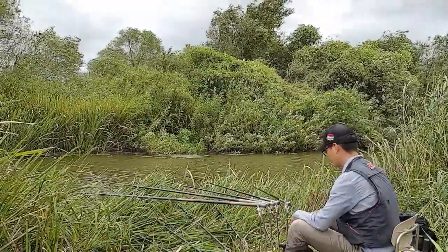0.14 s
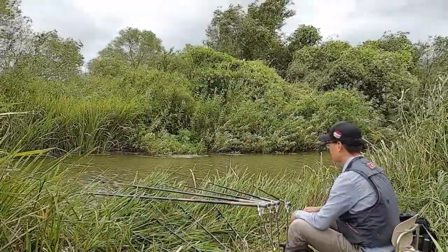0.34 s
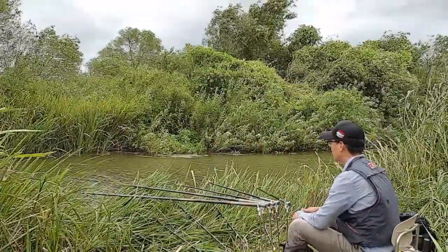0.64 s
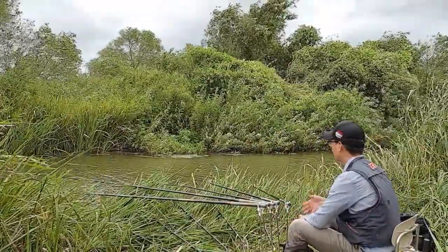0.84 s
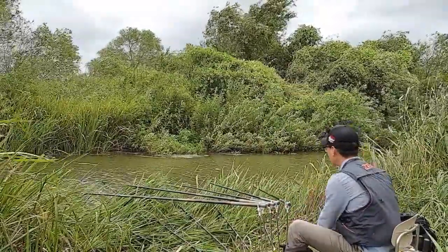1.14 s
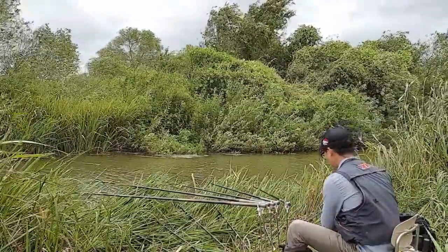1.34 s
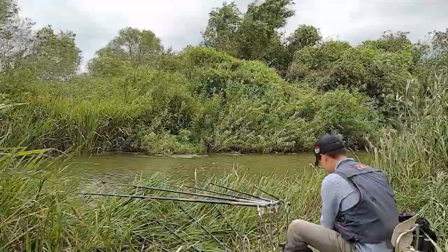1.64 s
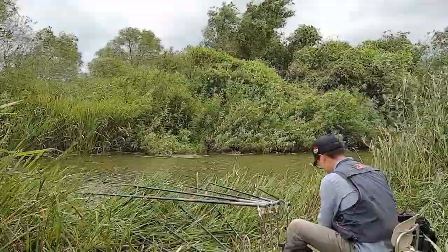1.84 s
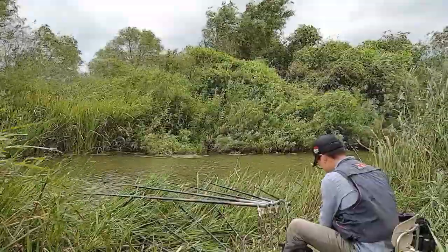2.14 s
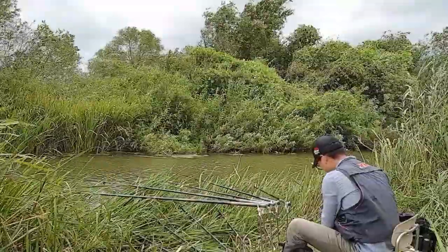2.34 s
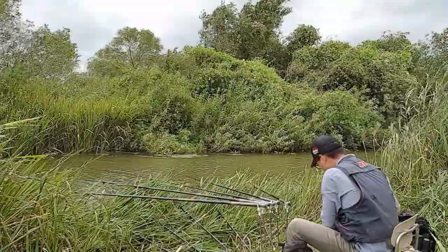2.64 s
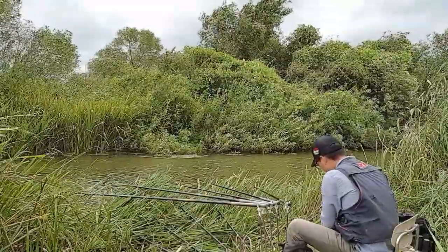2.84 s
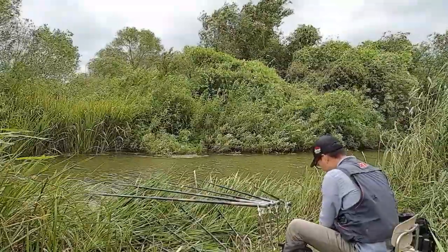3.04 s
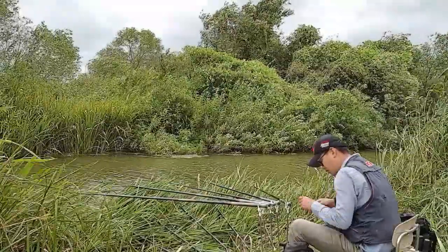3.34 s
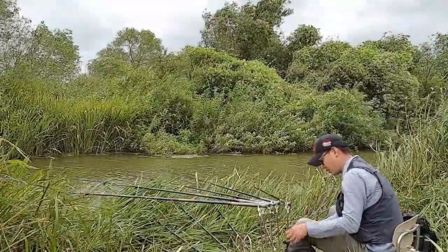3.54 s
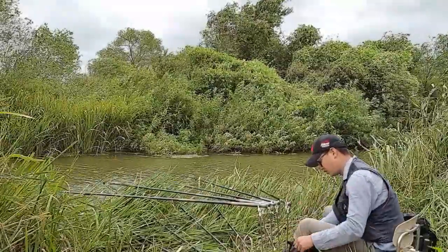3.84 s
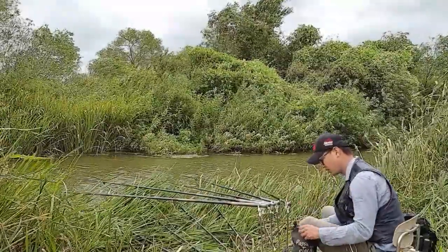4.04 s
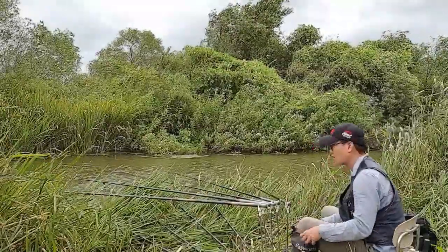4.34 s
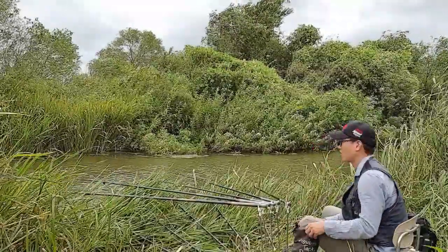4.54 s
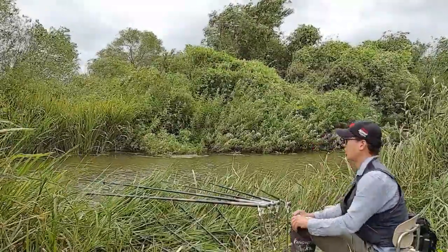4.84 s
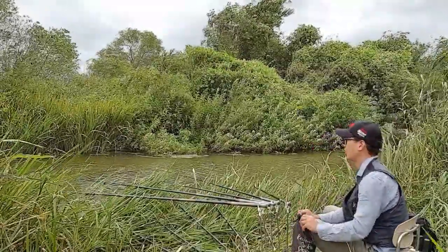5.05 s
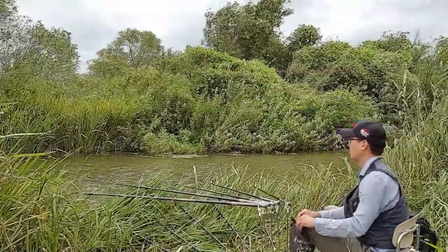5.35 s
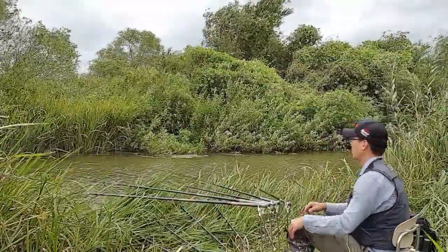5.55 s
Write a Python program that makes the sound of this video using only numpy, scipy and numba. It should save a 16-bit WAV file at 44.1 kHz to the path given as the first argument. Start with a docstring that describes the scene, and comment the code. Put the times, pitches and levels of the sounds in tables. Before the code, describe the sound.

Cicadas buzz steadily in riverside bushes while gusty wind thumps and flutters over the microphone and reeds rustle softly.

```python
"""Cicadas buzz in the bushes by a windy summer riverbank, heard at two small microphone ports.
Clicks from buckling ribs shape noise that rings through body tones; a wider, unrelated chorus blurs behind.
Leaves and reeds rush from the other side as coloured noise that wavers.
Gusts buffet the ports with rumble and flutter, noise shaken by eddies, and with short pops of air."""
import sys
import numpy as np
from scipy import signal
from scipy.fft import rfft, irfft
from scipy.io import wavfile
from scipy.ndimage import uniform_filter1d
from numba import njit

SR = 44100
rng = np.random.default_rng(int(sys.argv[2]) if len(sys.argv) > 2 else 0)


def volts(x):
    """Linear amplitude factor 10**(x/20) for a level x in dB, scalar or array-like."""
    e = np.asarray(x, float) / 20
    return 10 ** e


def generate_wav(signal):
    """Clip the signal to [-1, 1] and save it as 16-bit WAV at the path in sys.argv[1]."""
    frames = np.transpose(np.atleast_2d(signal))
    scaled = np.clip(frames, -1, 1) * 32767
    pcm = np.round(scaled).astype(np.int16)
    wavfile.write(sys.argv[1], SR, pcm)


N = 251149
T = np.arange(N) / SR
HZ = np.arange(N // 2 + 1) * SR / N

# Gusts at the ports. Each row: time in seconds, rumble level at the left port in dB, flutter level in dB,
# left minus right rumble level in dB.
GUSTS = [(0.0, -53, -40.5, -10), (0.08, -41, -56, 22), (0.23, -33.5, -39, -4), (0.42, -52.5, -52, -4.5),
         (0.56, -60, -54, -16), (0.63, -34.5, -42.5, 10), (0.75, -37, -37, 6), (1.0, -36, -42.5, 5),
         (1.21, -40, -47, 19), (1.48, -37, -40, 6), (1.68, -42.5, -51, 0), (1.8, -36, -36, -2.5),
         (1.92, -31.5, -36, 4), (2.07, -33, -43.5, 2), (2.15, -34, -34, 12), (2.29, -49, -53, 6),
         (2.45, -34, -39.5, 30), (2.58, -35.5, -42.5, 15), (2.7, -27.5, -34.5, 13), (2.84, -32, -35, 10),
         (2.92, -39, -45.5, 36), (3.24, -41.5, -43.5, 37), (3.36, -38, -47, -7), (3.48, -43.5, -49, 22),
         (3.76, -43, -52, 26), (3.86, -43, -52, 8), (4.33, -39, -47.5, 12), (4.46, -71, -58, 11),
         (4.78, -51, -57, 5), (4.85, -61, -68, 4), (4.92, -40, -46.5, 11), (5.05, -73, -58, -20),
         (5.17, -53, -64, -1), (5.69, -61, -59, 31)]


def curves(table):
    """Columns of a table after its times, drawn as one value a sample."""
    s, *columns = np.transpose(table)
    return [np.interp(T, s, column) for column in columns]


def unit(x):
    """Scale to rms 1."""
    return x / np.sqrt(np.mean(x ** 2))


def colour(x, points):
    """Filter through a spectrum of (Hz, dB) points."""
    hz, db = np.transpose(points)
    gain_db = np.interp(np.log(HZ + 1), np.log(hz), db, left=-90, right=-90)
    return irfft(rfft(x) * volts(gain_db), N)


def band_rms(x, lo, hi):
    """Rms between lo and hi Hz of the mean of both ports."""
    power = abs(rfft(np.mean(x, axis=0))) ** 2
    return np.sqrt(2 * power[(HZ > lo) & (HZ < hi)].sum()) / N


def walk(rate):
    """Random levels held 1 / rate s and slewed twice; spread 1."""
    hold = int(SR / rate)
    steps = np.repeat(rng.standard_normal(N // hold + 1), hold)
    return unit(uniform_filter1d(uniform_filter1d(steps, hold), hold)[:N])


def noise():
    """Unrelated noise for each port."""
    return rng.standard_normal((2, N))


def blend(common, share):
    """Mix a sound common to the ports with unrelated noise; share is the common part of the power."""
    return np.sqrt(share) * common + np.sqrt(1 - share) * noise()


@njit
def ring(x, hz, width):
    """A moving resonance: four state-variable band-passes in a row for steep skirts, gain 1 at the centre."""
    y, band, low = x.copy(), np.zeros(4), np.zeros(4)
    for i in range(len(x)):
        g, damping = np.tan(np.pi * hz[i] / SR), width / hz[i]
        for n in range(4):
            v = (band[n] + g * (y[i] - low[n])) / (1 + g * (g + damping))
            band[n], low[n] = 2 * v - band[n], low[n] + 2 * g * v
            y[i] = damping * v
    return y


def strokes(jitter_ms=.4):
    """Loudness of the nearest singer: each stroke buckles its ribs in turn, each a click that dies fast."""
    # Pace of the song. Each row: time in seconds, mean tymbal strokes a second.
    pace = [(0, 38.1), (3.0, 37.9), (5.69, 37.6)]
    # Ribs that buckle in one stroke. Each row: mean delay after its start in ms, mean click level in dB.
    ribs = [(0, 0.5), (4.7, -3), (9.5, -4.5), (13.5, -8.5), (18.3, -19.5)]
    phase = np.cumsum(curves(pace)[0] * (1 + .006 * walk(6))) / SR
    starts = np.flatnonzero(np.diff(np.floor(phase)))
    clicks = np.zeros(N)
    for ms, db in ribs:
        late, strength = rng.standard_normal((2, len(starts)))
        at = starts + ((ms + jitter_ms * late) * SR / 1000).astype(int)
        np.add.at(clicks, np.clip(at, 0, N - 1), volts(db + 1.5 * strength))
    decay = np.exp(-1 / (SR * .0012))  # a click dies within about a millisecond
    singer = unit(signal.lfilter([1], [1, -decay], clicks))
    # neighbours in the same bushes fill the gaps between its clicks
    return unit(np.sqrt(singer ** 2 + 1.1))


def cicadas(right_db=0.73, lag=14):
    """Clicks from one side reach the right port first, by lag samples; the far chorus is an unrelated blur."""
    # Swells of the song. Each row: time in seconds, level in dB.
    song = [(0.0, -30), (0.07, -33.5), (0.16, -31.5), (0.55, -30), (0.68, -33), (0.8, -32), (1.3, -31.5),
            (1.43, -28.5), (1.6, -30.5), (1.85, -30.5), (2.15, -33.5), (2.33, -29.5), (2.45, -33),
            (2.6, -31.5), (3.0, -33.5), (3.13, -30.5), (3.6, -31.5), (3.76, -32.5), (3.87, -30), (4.0, -33),
            (4.1, -29), (4.23, -31.5), (4.76, -28), (4.87, -32), (4.97, -29), (5.28, -28.5), (5.69, -29)]
    # Tuning of the body tones. Each row: time in seconds, rise in percent.
    tuning = [(0, -.8), (2.4, -.8), (3.5, -.3), (4.5, .8), (5.0, 1.8), (5.69, 2.2)]
    # Body tones, low to high. Each row: centre in Hz before tuning, width in Hz, gain in dB,
    # share of the power heard from one direction, 0 to 1.
    tones = [(3493, 320, -2.5, 0.46), (4084, 1520, -11.5, 1), (4715, 870, 0.53, 0.39),
             (5576, 450, 0.6, 0.05), (6157, 500, 1.33, 0.5), (6780, 300, -3, 0.92),
             (7280, 1240, -9.5, 0.32), (8910, 1470, -13.5, 0.23), (10890, 3200, -12.5, 0.36),
             (13700, 5800, -25, 0.2)]
    db, tune, clicks = curves(song)[0], 1 + curves(tuning)[0] / 100, strokes()
    main, treble = np.zeros((2, N)), np.zeros((2, N))
    swell_db = 0.48 * walk(22.1) + 0.44 * walk(9)
    for hz, width, tone_db, share in tones:
        near = clicks * rng.standard_normal(N)
        ports = blend(np.array([np.roll(near, lag), near]), share)
        own_db = .45 * walk(3) + .6 * walk(9) + .9 * walk(18)  # each tone wavers alone
        # singers differ in size, so each tone's pitch wavers as they take turns
        centre = hz * tune * (1 + .006 * walk(3))
        stage_width = width / np.sqrt(2 ** .25 - 1)  # four stages narrow it to width
        tone = np.array([ring(port, centre, stage_width) for port in ports])
        tone *= volts(tone_db + swell_db + own_db)
        if hz < 8200:
            main += tone
        else:
            treble += tone
    main[1] *= volts(right_db)
    # the treble swells less than the body tones and flickers quickly
    flicker_db = .4 * walk(40) + .8 * walk(13)
    treble *= volts(flicker_db - .5 * (db - np.mean(db)))
    return volts(db) * (main + treble) / band_rms(main, 3100, 7000)


def leaves(share=0.58, lag=17):
    """Reeds and leaves rush as coloured noise; its common part reaches the left port first, by lag samples."""
    # Spectrum of the foliage. Each row: frequency in Hz, gain in dB.
    foliage = [(130, -39), (200, -30), (280, -13), (420, -3.5), (600, -6.5), (900, -9), (1400, -12),
               (2000, -16), (2800, -18.5), (3600, -5)]
    # Rise and fall of the rush. Each row: time in seconds, level in dB.
    rush = [(0.0, -60.5), (1.47, -59), (1.85, -58.5), (2.55, -56.5), (2.82, -60.5), (3.14, -56.5),
            (3.28, -58), (3.74, -59), (5.69, -58)]
    common = rng.standard_normal(N)
    x = blend(np.array([common, np.roll(common, lag)]), share)
    x = colour(x, foliage) * volts(1.1 * walk(10))
    return volts(curves(rush)[0]) * x / band_rms(x, 1200, 2400)


def gusty(x, db):
    """Hold the mean level over a tenth of a second at db; quicker bursts pass."""
    slow = uniform_filter1d(uniform_filter1d(x ** 2, 3500, axis=1), 2500, axis=1)
    return volts(db) * x / np.sqrt(slow)


def wind(shared=0.11, quick_db=6.0, sway_db=0.9):
    """Big eddies shake both ports, small ones each alone; they lift the flutter more than the rumble."""
    # Spectrum of the low buffeting. Each row: frequency in Hz, gain in dB.
    rumble_tone = [(20, -24), (35, -7.5), (60, 2), (95, 0), (140, -3.5), (190, -5.5), (260, -16.5),
                   (400, -27)]
    # Spectrum of the brighter buffeting. Each row: frequency in Hz, gain in dB.
    flutter_tone = [(120, -51), (190, -18), (250, -1), (340, -0.2), (480, -5.5), (750, -17.5), (1200, -28),
                    (2400, -29.5)]

    def each_port(rate):
        return np.array([walk(rate) for port in range(2)])

    def air():
        return blend(rng.standard_normal(N), shared)

    rumble_db, flutter_db, left_over_right_db = curves(GUSTS)
    eddies = 4.0 * walk(30) + 2.5 * each_port(28)  # scaled to dB for each layer below
    quick = quick_db * each_port(80)
    rumble = colour(volts(1.17 * eddies) * air(), rumble_tone)
    flutter = colour(volts(1.52 * eddies + quick) * air(), flutter_tone)
    ports_db = rumble_db - np.array([np.zeros(N), left_over_right_db])
    rumble = gusty(rumble, ports_db + sway_db * each_port(12))
    flutter = gusty(flutter, flutter_db + sway_db * each_port(12))
    return rumble + flutter


def small_pops(count=60, above_db=11, spread_db=3, low_hz=80, octaves=2.93, edge_db=-22, aim_db=15):
    """Rows for pops at chance moments, each with its level set relative to the flutter at that moment."""
    when, size, tone, side = rng.random((count, 4)).T
    s = .03 + when * (T[-1] - .06)
    db = np.interp(s, T, curves(GUSTS)[1]) + above_db + spread_db * (2 * size - 1)
    hz = low_hz * 2 ** (octaves * tone)
    pan_db = aim_db * np.sign(side - .5)  # at one port or the other
    return np.transpose([s, db, hz, np.full(count, edge_db), pan_db])


def pops(cycles=1.2, edge_ms=0.66, edge_hz=1000, apart_turns=0.51):
    """A slug of air slaps the ports, the nearer one harder: a cycle or two, with a brighter edge."""
    # Pops and low thumps of air at set times. Each row: time of the peak in seconds, peak of the body's
    # envelope in dB, body frequency in Hz, edge level in dB above that peak, left minus right in dB.
    slaps = [(0.17, -25.5, 320, -15, 4), (0.257, -25.5, 410, -20, 11), (0.744, -17, 164, -42, -10),
             (0.793, -25, 444, -11, -15), (0.906, -26, 400, -14, 2), (0.912, -21, 75, -42, 5),
             (0.954, -20, 358, -16, -3), (1, -21, 316, -30, 5), (1.053, -18, 313, -35, 0),
             (1.233, -28, 468, -7, -9), (1.33, -26.5, 89.5, -40, 4), (1.428, -21.5, 342, -17, 7),
             (1.491, -26, 90, -38, 1), (1.542, -27, 109, -40, 3), (1.654, -26, 70, -38, 1),
             (1.762, -22.5, 152, -34, 25), (1.839, -25, 390, -17, 16), (1.851, -18, 135, -40, -17),
             (1.905, -18, 334, -23, -4), (1.909, -23, 103, -40, -4), (1.943, -25, 310, -26, -15),
             (1.996, -18, 283, -19, 15), (2.045, -26.5, 380, -13, -2), (2.115, -13, 358, -25, -1),
             (2.166, -20, 415, -18, 1), (2.196, -20, 292, -23, 2), (2.237, -26, 153, -20, -2),
             (2.521, -22.5, 190, -14, -7), (2.555, -21, 172, -37, -2), (2.608, -20, 400, -11, -17),
             (2.623, -21.5, 443, -0.5, -15), (2.699, -13.5, 510, -20, -11.5), (2.725, -20, 390, -9, -13),
             (2.74, -18.5, 366, -10, -4), (2.763, -22, 250, -23, 11), (2.818, -18, 360, -36, -15),
             (2.853, -24.5, 440, -11, -15), (3.061, -27.5, 470, -5, -15), (3.197, -30, 480, -8, -13),
             (3.32, -27, 90, -40, 4), (3.365, -31, 85, -47, -2), (3.595, -22.5, 328, -24, 5),
             (3.877, -32, 86, -53, 2), (4.056, -27, 374, -20, -23), (4.074, -30, 81, -52, 1),
             (4.253, -25.5, 228, -18, 15), (4.325, -27, 72, -40, -1), (4.925, -32, 88, -37, 1)]
    out, half = np.zeros((2, N)), 1200
    t = np.arange(-half, half) / SR
    for s, db, hz, edge_db, pan_db in np.vstack([small_pops(), slaps]):
        # chance phases in turns for body and edge; the right port's lie up to apart_turns further on
        turns, apart = rng.random((2, 2, 1, 1))
        body_turns, edge_turns = turns + apart_turns * apart * [[0], [1]]
        body = np.exp(-(2 * t * hz / cycles) ** 2) * np.cos(2 * np.pi * (hz * t + body_turns))
        edge = np.exp(-(t * 1000 / edge_ms) ** 2) * np.cos(2 * np.pi * (edge_hz * t + edge_turns))
        port_db = db + np.minimum(0, [[pan_db], [-pan_db]])
        at = int(s * SR) - half
        out[:, at:at + len(t)] += volts(port_db) * (body + volts(edge_db) * edge)
    return out


def scene():
    """Everything the two ports hear."""
    return cicadas() + leaves() + wind() + pops()


def low_pass(x):
    """Removes everything above the highest recorded frequency."""
    return signal.sosfilt(signal.butter(12, 15730, fs=SR, output="sos"), x)


def record(dry):
    """Pass on the finished mix of both ports."""
    return low_pass(dry)


dry = scene()
out = record(dry)
generate_wav(out)
```